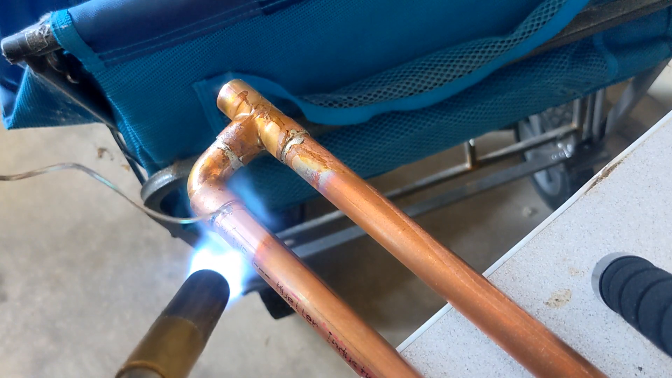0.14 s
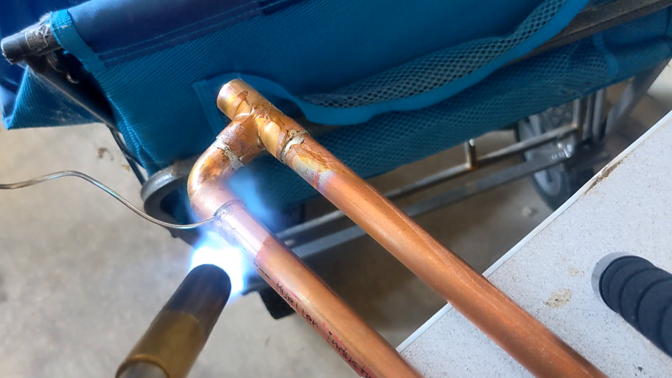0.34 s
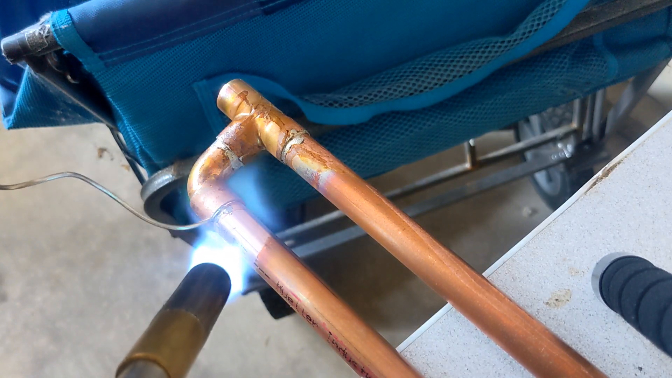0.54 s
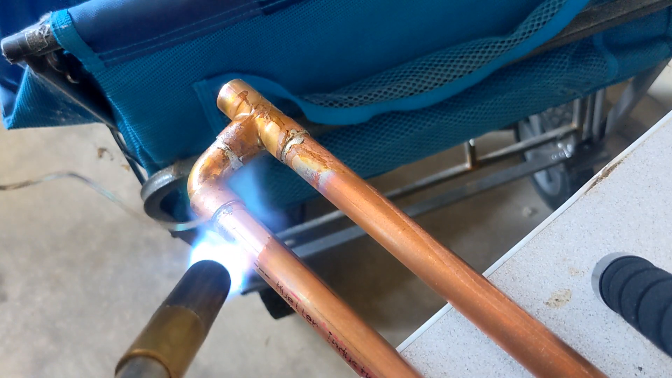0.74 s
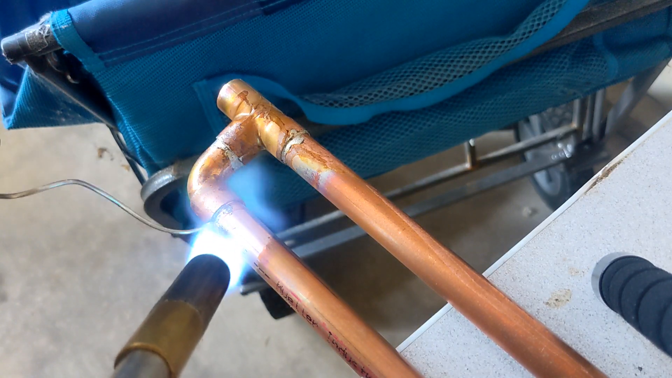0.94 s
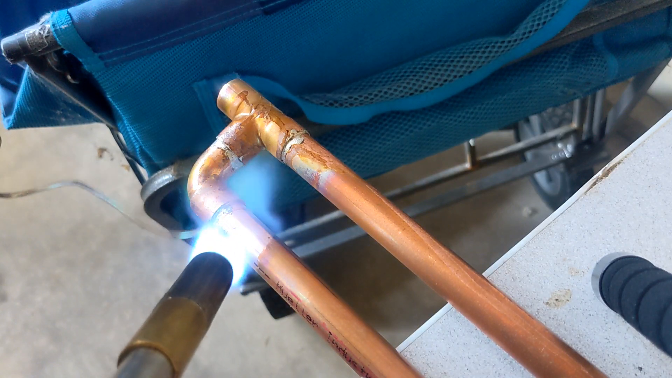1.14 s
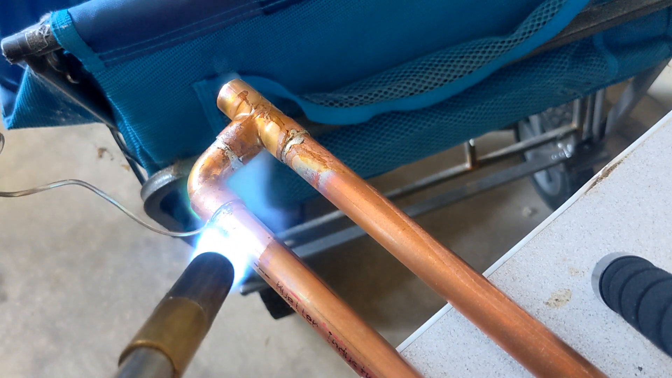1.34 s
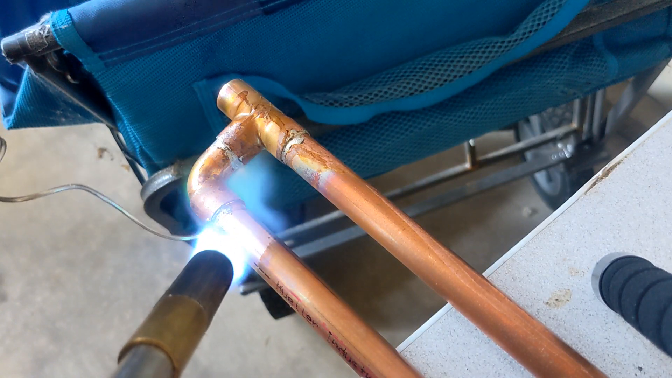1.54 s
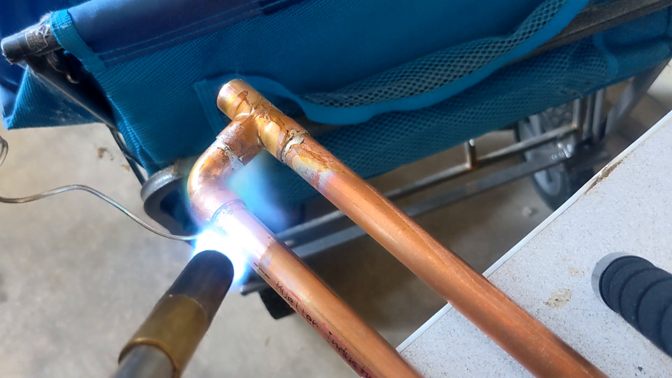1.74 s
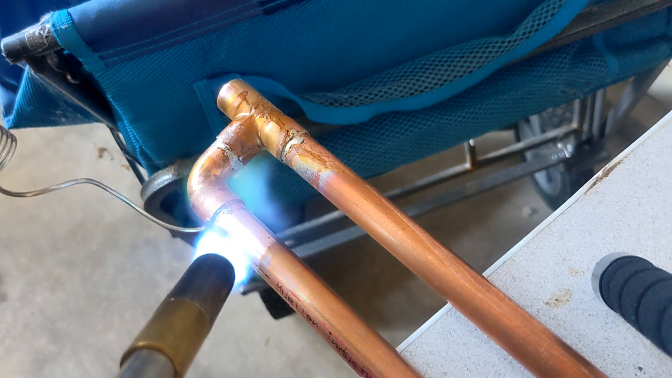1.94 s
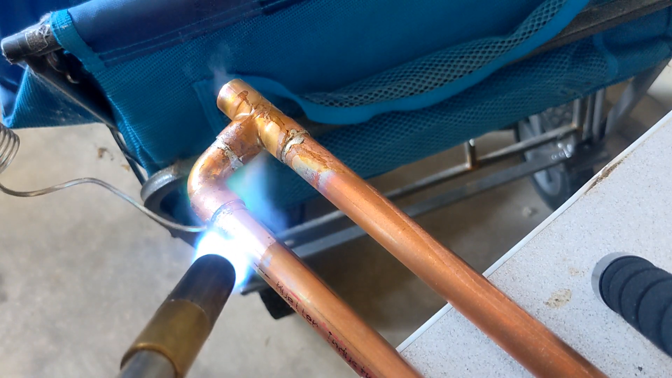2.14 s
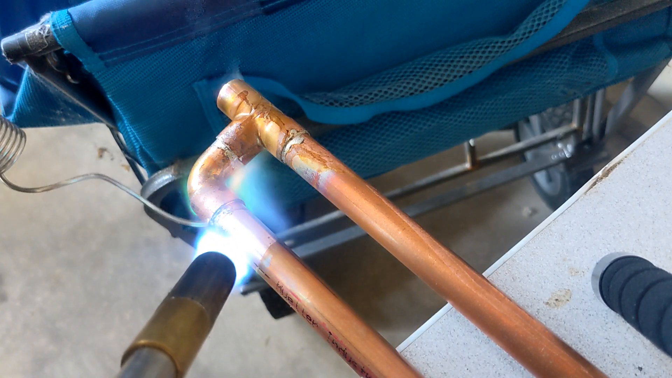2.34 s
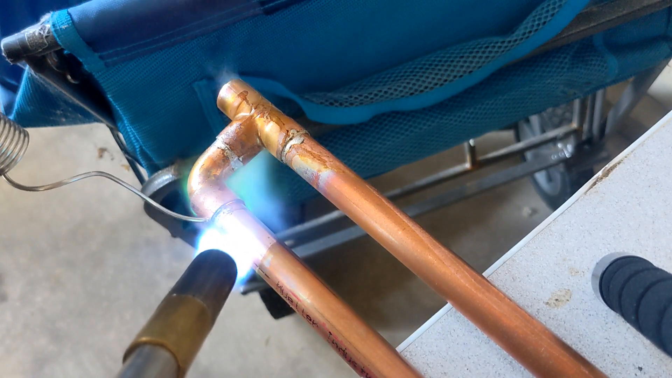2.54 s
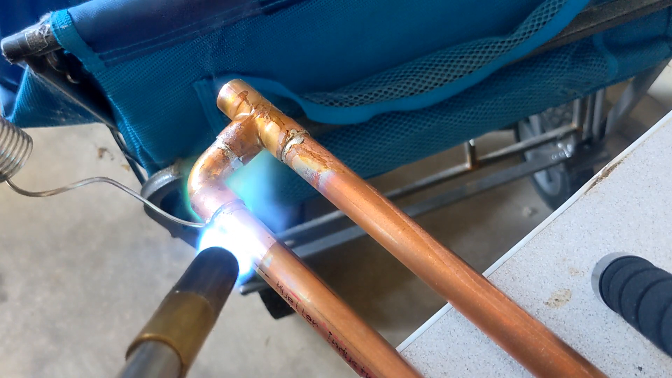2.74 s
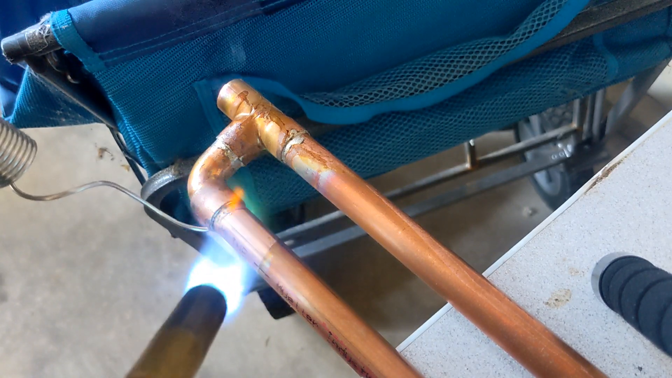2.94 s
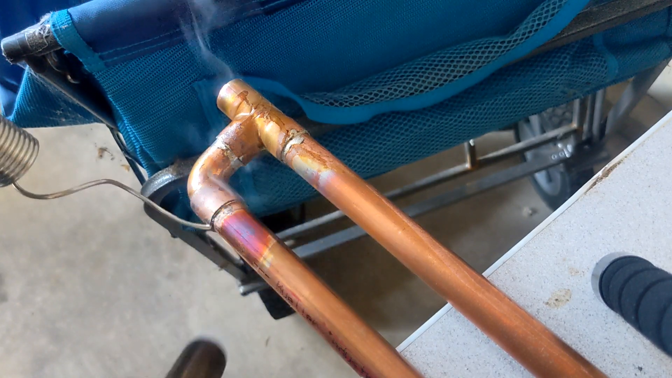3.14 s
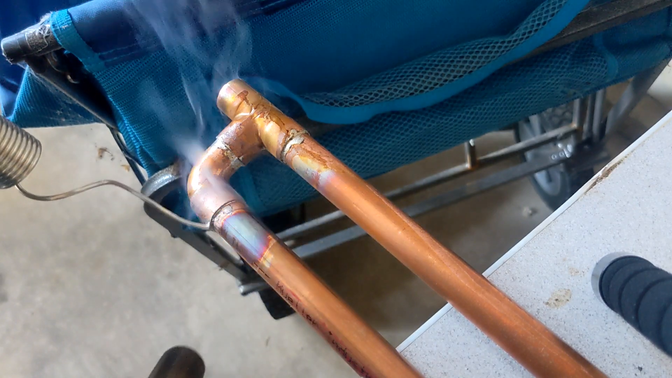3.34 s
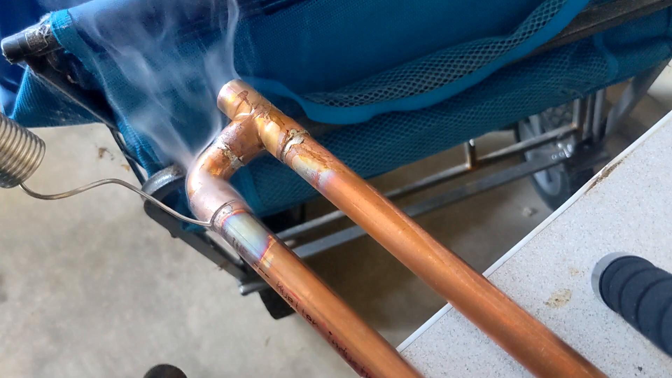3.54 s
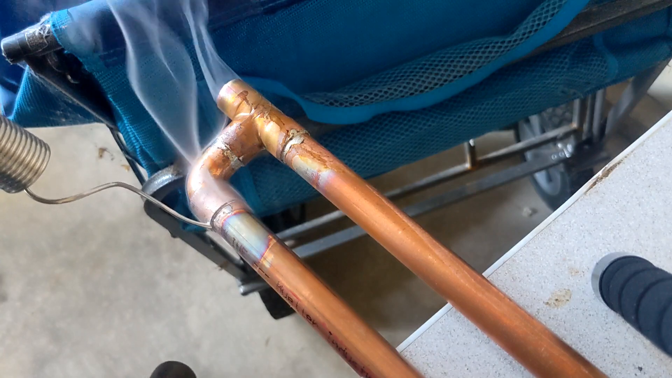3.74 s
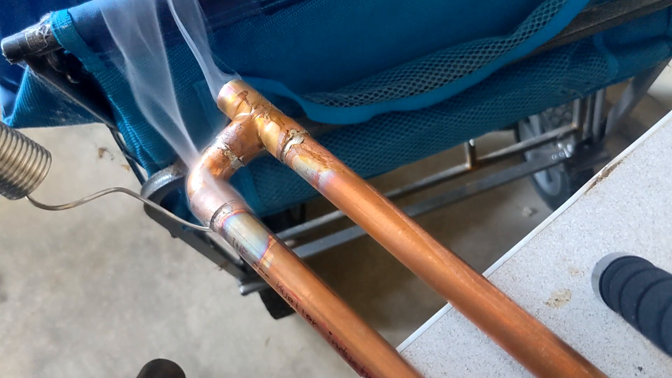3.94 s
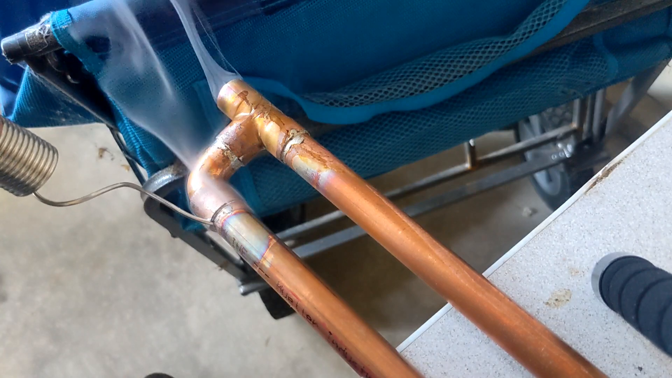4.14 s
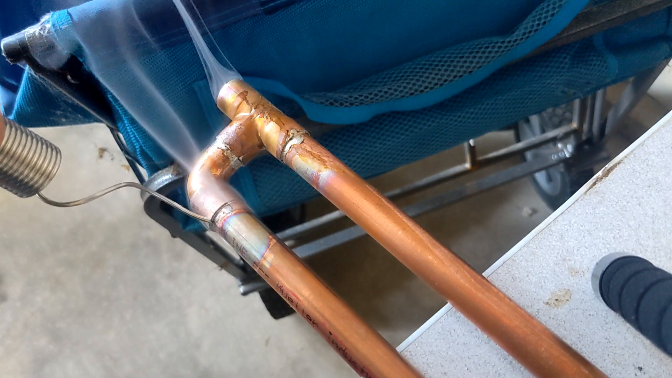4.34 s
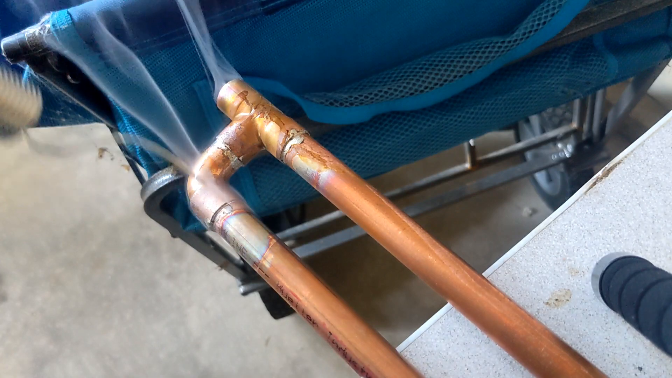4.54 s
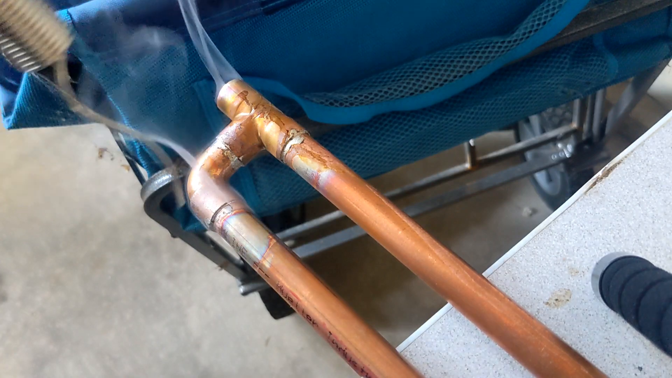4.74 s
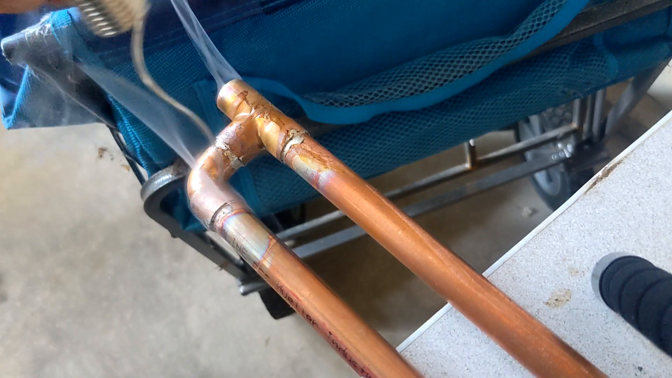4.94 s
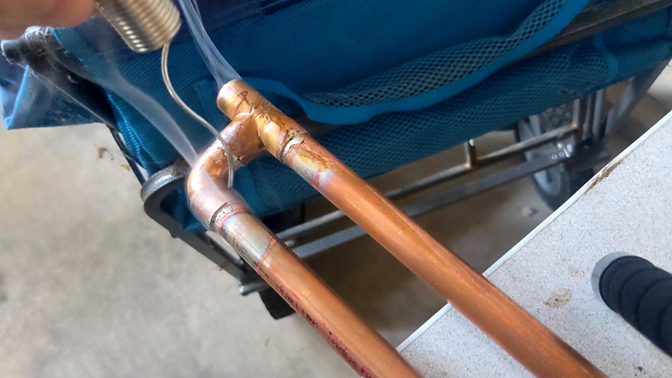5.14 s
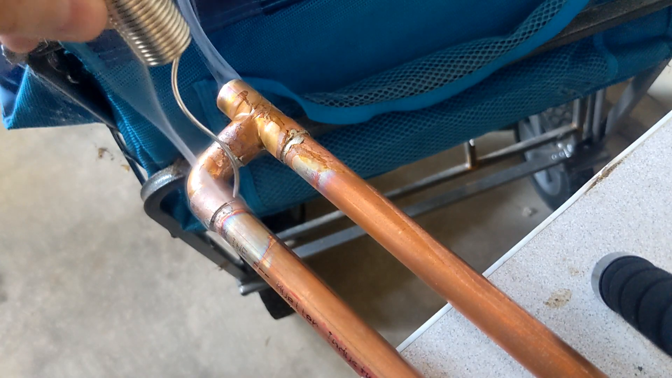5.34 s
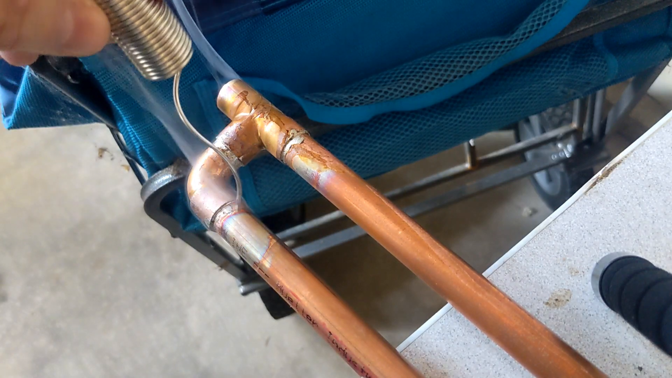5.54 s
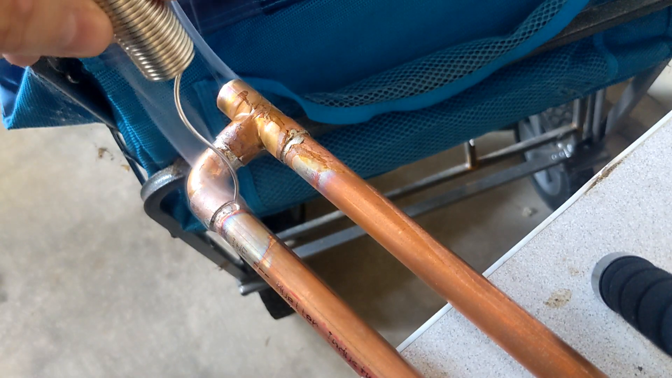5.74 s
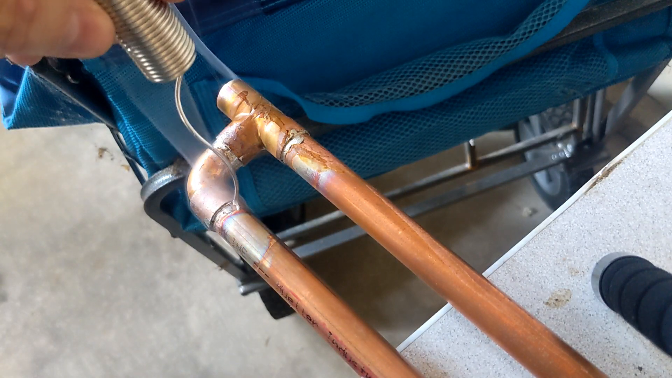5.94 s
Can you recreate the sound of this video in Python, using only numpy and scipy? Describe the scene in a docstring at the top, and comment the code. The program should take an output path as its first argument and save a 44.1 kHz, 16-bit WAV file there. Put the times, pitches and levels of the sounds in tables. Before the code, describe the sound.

A gas torch roars and hisses steadily against copper pipe, shuts off abruptly, then is set down with a quick double knock, leaving appliance hum.

```python
"""A gas torch roars and hisses against a copper pipe in a garage. Its gas is shut off, then it is set
down with two knocks, a spring singing between them; an appliance's hum and a faint later tick are left.
Flame and air are coloured noise, partly alike at the two ports of a close microphone. Hum is steady
sines; knocks are noise cracks, ringing body tones and falling thuds. Echoes and a tail add the room."""
import sys
import numpy as np
from scipy import signal
from scipy.io import wavfile
from scipy.ndimage import uniform_filter1d

SR = 44100
rng = np.random.default_rng(int(sys.argv[2]) if len(sys.argv) > 2 else 0)


def convert_level_to_amplitude(level_db):
    """Map a level in decibels to its linear amplitude factor."""
    exponent = np.asarray(level_db, float) / 20
    return 10 ** exponent


def waveform_to_disk(signal):
    """Save audio, clipped to [-1, 1], as 16-bit WAV at the path in sys.argv[1]."""
    frames = np.transpose(np.atleast_2d(signal))
    scaled = np.clip(frames, -1, 1) * 32767
    samples = np.round(scaled).astype(np.int16)
    wavfile.write(sys.argv[1], SR, samples)


N = 267907  # length in samples

# blows of the torch as it is set down: t/s, blow level/dB, place on the torch (0 base - 1 neck),
# crack level before its filter/dB, first pitch of the thud f/Hz
KNOCKS = [(3.2755, -25, 0, -53, 380), (3.3248, -24, 1, -39, 800), (3.3288, -36, 1, -45, 400)]
LEFT_LATE_S = 0.00023  # the torch reaches the left port later


def read(points, hz):
    """Straight lines between points on a log-frequency axis."""
    f, value = np.transpose(points)
    return np.interp(np.log(hz + 1), np.log(f + 1), value)


def bumps(modes, hz):
    """The dB that resonances and dips add, each strongest at its own frequency."""
    return sum(db / (1 + (2 * (hz - f) / width) ** 2) for f, width, db in modes)


def add(mix, s, sound):
    """Mixes a sound in from time s."""
    part = mix[:, round(s * SR):][:, :sound.shape[1]]
    part += sound[:, :part.shape[1]]


def noise_pair(db, same, lead, patchy_db):
    """Two partly alike noises: level db(hz), likeness same(hz), left phase lead(hz), drifting patches."""
    hz = np.fft.rfftfreq(2048, 1 / SR)
    a, b, c, d, patches = rng.standard_normal((N // 512 + 5, 1025, 5)).T
    patches = uniform_filter1d(patches, size=20, axis=0)  # smooth over frequency
    patches = uniform_filter1d(patches, size=6, axis=1)  # smooth over time
    alike = np.clip(same(hz), 0, 1)[:, None]
    right = a + 1j * b
    left = alike * right + np.sqrt(1 - alike ** 2) * (c + 1j * d)
    left = left * np.exp(1j * lead(hz))[:, None]
    level_db = db(hz)[:, :, None] + patchy_db * patches / patches.std()
    spectrum = np.array([left, right]) * convert_level_to_amplitude(level_db)
    return signal.istft(spectrum * np.sqrt(SR / 2048), nperseg=2048, noverlap=1536)[1][:, :N]


def air():
    """Rumble and fan noise of the garage: long waves make the bass alike at both ports."""
    # colour of the background before it is set to its overall level: f/Hz, relative level/dB
    colour = [(45, -2), (130, -2.5), (200, -4), (320, -16.5), (390, -12), (560, -19), (1000, -23.5),
              (1600, -31.5), (4000, -42.5), (6000, -48), (7200, -46.5), (9300, -52), (10700, -56.5),
              (15000, -51.5)]
    # standing waves and resonances: f/Hz, width/Hz, change/dB
    modes = [(59, 10, 3), (77.2, 12, 4.5), (104.8, 17, -10.5), (204.6, 30, -3.5), (256, 14, 4.5),
             (320, 30, -3.5), (420, 29.8, -4), (701, 53.6, -3), (1320, 280, 3), (2265, 250, 6),
             (3170, 400, 3.5)]
    # how much louder left is than right: f/Hz, difference/dB
    balance = [(60, -0.5), (180, -1), (550, -2), (1650, -2), (4970, -3.5), (15000, 1.5)]
    # likeness of left and right: f/Hz, likeness (0-1)
    likeness = [(60, 1), (250, 0.97), (500, 0.66), (800, 0.4), (1500, 0.19), (8000, .05)]
    level_db, left_lead_s = -42.5, 0.00018  # the background reaches the left port first

    def db(hz):
        return read(colour, hz) + bumps(modes, hz) + np.array([[.5], [-.5]]) * read(balance, hz)

    noise = noise_pair(db, lambda hz: read(likeness, hz),
                       lambda hz: 2 * np.pi * hz * left_lead_s, patchy_db=.5)
    return convert_level_to_amplitude(level_db) * noise / noise.std()


def hum():
    """Sines at multiples of twice the mains frequency and motor tones, steady but for one that throbs."""
    # hum: multiple of twice the mains frequency, left level/dB, right level/dB, left phase lead/rad
    multiples = [(1, -49.6, -51.1, 0), (2, -49.5, -45.7, .08), (3, -69, -67, -.4), (4, -74, -59, -1),
                 (5, -50.9, -46.6, -.6), (6, -51.9, -53.7, .87), (7, -69, -82, -1.5)]
    # motor: f/Hz, left level/dB, right level/dB, left phase lead/rad, depth of throb (0-1)
    motor = [(276.19, -58.5, -61.5, -.15, 0), (617.82, -67, -56.4, -.16, 0), (632.75, -48, -48.2, 1.15, .3),
             (650.96, -68, -70, .84, 0), (784.95, -73, -81, -.46, 0), (992.55, -71, -68.4, 2.13, 0),
             (1232.4, -67.5, -86, .7, 0)]
    twice_mains_hz, throb_per_s = 119.93, 3.3
    t = np.arange(N) / SR
    out = np.zeros((2, N))
    tones = [(k * twice_mains_hz, *rest, 0) for k, *rest in multiples] + motor
    for hz, left_db, right_db, lead, depth in tones:
        turn = 2 * np.pi * (hz * t + rng.random())
        throb = 1 + depth * np.cos(2 * np.pi * throb_per_s * (t - 3.78))
        left = convert_level_to_amplitude(left_db) * np.sin(turn + lead)
        right = convert_level_to_amplitude(right_db) * np.sin(turn)
        out += np.sqrt(2) * throb * np.array([left, right])  # levels are rms
    return out


def tick():
    """A faint dry tick of the wire: a fast-dying band of noise, the same at both ports."""
    # one row: level before the band filter/dB, middle f/Hz, width/Hz
    shape = (-48, 5900, 3600)
    db, hz, width = shape
    start_s, t60_s = 5.6135, 0.019
    out = np.zeros((2, N))
    t = np.arange(600) / SR
    band = signal.butter(3, [hz - width / 2, hz + width / 2], "bandpass", fs=SR, output="sos")
    noise = signal.sosfilt(band, rng.standard_normal((1, len(t))))
    add(out, start_s, convert_level_to_amplitude(db - 60 * t / t60_s) * noise)
    return out


def garage(x):
    """Room tail: sparse taps of random sign, each band dying at its own speed."""
    # time to die by 60 dB: f/Hz, t60/s
    decay = [(150, 0.59), (600, 0.34), (2500, 0.49), (8000, 0.31), (15000, .25)]
    taps = np.zeros((2, SR))
    at = np.arange(300, SR - 20, 20) + rng.integers(0, 20, (2, (SR - 301) // 20))
    np.put_along_axis(taps, at, rng.choice([-1., 1.], at.shape), 1)
    hz, t, z = signal.stft(taps, SR, nperseg=256)
    alike = np.exp(-(hz[:, None] / 1500) ** 2)  # long waves reach both ports alike
    z = np.array([alike * z[1] + np.sqrt(1 - alike ** 2) * z[0], z[1]])
    dying = convert_level_to_amplitude(-60 * t / read(decay, hz)[:, None])
    tail = signal.istft(z * dying, SR, nperseg=256)[1]
    return signal.fftconvolve(x, tail / np.linalg.norm(tail[0]), axes=1)[:, :N]


def echoed(x):
    """The direct sound and its first few delayed copies."""
    # echoes off pipe, bench and floor: delay t/s, left gain, right gain
    echoes = [(.0030, 0.067, 0.12), (.0042, 0.083, 0.17), (.00535, 0.0061, -0.036), (.0076, -0.037, 0.032),
              (.011, -.08, 0.051), (.016, 0.039, -0.083)]
    out = x.copy()
    for s, left, right in echoes:
        add(out, s, x * np.array([[left], [right]]))
    return out


def spring():
    """A wavering tone whose pitch arches as it swells, until the second knock damps it."""
    start_db, swell_db, damped_t60_s = -45, 3.5, .04
    base_hz, arch_hz = 1210, 100
    length = KNOCKS[1][0] - KNOCKS[0][0]
    t = np.arange(SR // 5) / SR
    u = np.minimum(t / length, 1)  # 0 at the first knock, 1 from the second on
    waver = uniform_filter1d(rng.standard_normal(len(t)), size=150)
    hz = (base_hz + arch_hz * np.sin(np.pi * u ** .7)) * (1 + .3 * waver)
    db = start_db + swell_db * u - 60 * np.maximum(t - length, 0) / damped_t60_s
    return np.sqrt(2) * convert_level_to_amplitude(db) * np.sin(2 * np.pi * np.cumsum(hz) / SR)


def thud(t, top_hz):
    """A dying low tone: its pitch drops fast as the contact spreads, then sags slowly."""
    level_db, t60_s = 2, .15  # level is against the blow
    low_hz, drop_s, sag_s = 245, .003, .05
    hz = low_hz * np.exp(-t / sag_s) + (top_hz - low_hz) * np.exp(-t / drop_s)
    swell = np.minimum(t / .003, 1)
    return convert_level_to_amplitude(level_db - 60 * t / t60_s) * swell * np.sin(2 * np.pi * np.cumsum(hz) / SR)


def knocks():
    """Setting down: each blow is a crack, a body ring and a falling thud; the first starts the spring."""
    # what torch and bench ring with, against the blow:
    # f/Hz, level struck at the base/dB, level struck at the neck/dB, t60/s
    body_modes = [(95, -4, -12, .2), (140, -8, -10, .12), (218, -12, -6, .12), (390, -12, -9, .05),
                  (620, -3, -1, .03), (850, -10, -4, .022), (1350, -10, -9, .018), (2250, -6, -24, .02),
                  (2620, -11, -24, .045), (3200, -24, -10, .024), (3620, -4, -15, .018),
                  (3850, -6, -14, .018), (4400, -30, -12, .014), (5000, -28, -14, .011),
                  (6900, -24, -20, .02), (8100, -26, -19, .018)]
    crack_band_hz, crack_t60_s = [500, 12000], .016
    pan_db = -3.5  # left against right
    pan = convert_level_to_amplitude([[pan_db / 2], [-pan_db / 2]])
    out = np.zeros((2, N))
    t = np.arange(SR // 3) / SR
    chance = rng.standard_normal((len(KNOCKS), 2, len(t)))
    dull = signal.butter(2, crack_band_hz, "bandpass", fs=SR, output="sos")
    for (s, blow_db, place, crack_db, top_hz), grit in zip(KNOCKS, chance):
        body = np.zeros(len(t))
        for hz, base_db, neck_db, t60 in body_modes:
            ring = convert_level_to_amplitude((1 - place) * base_db + place * neck_db - 60 * t / t60)
            build_up = np.minimum(t / (.0008 + .8 / hz), 1)  # low modes take longer
            body += ring * build_up * np.sin(2 * np.pi * hz * t)
        noise = signal.sosfilt(dull, grit[0] + .5 * grit)  # partly alike at the ports
        crack = convert_level_to_amplitude(crack_db - 60 * t / crack_t60_s) * noise
        add(out, s, pan * (convert_level_to_amplitude(blow_db) * (body + thud(t, top_hz)) + crack))
    add(out, KNOCKS[0][0], pan * spring())
    return np.array([np.roll(out[0], round(LEFT_LATE_S * SR)), out[1]])


def gas_flow():
    """Steady, then the valve closes ever faster and the gas left in the tube drains out."""
    flow_db, shut_s = 0.82, 3.0864  # steady until the valve starts to close
    close_db, close_s, close_bend = -25.5, 0.086, 1.5  # close_db down after close_s
    bleed_db, bleed_t60_s = -29, 0.53  # against the steady flow
    after = np.maximum(np.arange(N) / SR - shut_s, 0)
    closing = convert_level_to_amplitude(np.maximum(close_db * (after / close_s) ** close_bend, -200))
    draining = convert_level_to_amplitude(bleed_db - 60 * after / bleed_t60_s)
    return convert_level_to_amplitude(flow_db) * np.maximum(closing, draining)


def flame():
    """Turbulent burning and jet noise, coloured by the path to each port, following the gas flow."""
    # broad colour of roar and hiss at each port, before the gas flow: f/Hz, level per Hz/dB
    tilt_left = [(40, -99.5), (70, -63.5), (120, -61.5), (220, -51.5), (450, -59.5), (900, -45.5),
                 (1800, -47), (3500, -53.5), (7000, -79.5), (15600, -73)]
    tilt_right = [(40, -81), (70, -61), (120, -61.5), (220, -46.5), (450, -54.5), (900, -44), (1800, -48.5),
                  (3500, -45.5), (7000, -67.5), (15600, -70)]
    # resonances and dips of burner tube, pipe, bench and microphone body: f/Hz, width/Hz, change/dB
    path_left = [(215, 67, 1), (322, 16, 5.5), (800, 39, -1.5), (2168, 36, 9.5), (556, 20, -3),
                 (742, 47, 6), (861.4, 35.7, 7.5), (949, 74, -9.0), (1010, 64, -13.5), (1289, 46, -4),
                 (1780, 484, -15.5), (2094, 64, -2.0), (2247, 19, -4.5), (2580, 340, -9.5),
                 (3130, 840, -11.0), (3180, 82, 0.5), (4060, 820, -9.5), (4170, 36, -10), (4800, 30, -7),
                 (5430, 580, -7), (6500, 478, 8), (7452, 1349, 11.5), (8523, 420, 5), (9222, 470, -7.5),
                 (9469, 150, 3.5), (10030, 204, -13), (10600, 356, 11.5), (10724, 1143, -17),
                 (11128, 100, -9.5)]
    path_right = [(295, 39.7, -6.5), (318, 22, 3), (553, 18, -8), (817, 77, 2), (1850, 80, 4),
                  (494, 109, 7), (954, 115, -11), (1314, 315, 4.0), (1408, 31, 3), (1532, 152, -11.5),
                  (2070, 89, -3), (2510, 58, -10), (2670, 43.6, -4), (2710, 740, -11.5), (2997, 81, -1),
                  (3290, 32, 7), (3325, 60, -10.5), (3845, 1296, -14.0), (5300, 38, 2.5), (5590, 310, -11),
                  (6020, 84, -14), (6140, 170, 5), (6570, 216, -2.5), (7210, 690, 11.5), (8330, 1420, 7),
                  (9090, 220, 7), (10204, 186, 2), (12850, 220, 6.5), (13518, 430, 0.5)]
    # likeness of left and right: f/Hz, likeness (0-1)
    likeness = [(60, 0.89), (1400, 1), (2000, 1), (2800, 0.47), (3400, 0.6), (4000, 0.6), (4800, 0.92),
                (5800, 0.49), (6700, 0), (7500, .85), (8400, .65), (9000, .3), (12000, .2), (13500, .45)]
    # phase turned by the two paths besides the left port's delay: f/Hz, left phase lead/rad
    path_turn = [(600, 0.44), (1460, -.5), (1810, 1), (2410, 0.28), (3270, 1), (4480, 0.77), (6370, 2),
                 (7320, 0.5), (8900, -1.2), (9400, -2.5), (13400, -.2), (13600, 1), (14100, 0.2)]

    def db(hz):
        left = read(tilt_left, hz) + bumps(path_left, hz)
        right = read(tilt_right, hz) + bumps(path_right, hz)
        return np.array([left, right])

    def lead(hz):
        return read(path_turn, hz) - 2 * np.pi * hz * LEFT_LATE_S

    roar = noise_pair(db, lambda hz: read(likeness, hz), lead, patchy_db=0.7)
    flutter = uniform_filter1d(rng.standard_normal(N), size=300)  # the flame front flaps
    return roar * gas_flow() * convert_level_to_amplitude(0.28 * flutter / flutter.std())


def scene():
    """Torch with its room, over the steady background and the tick."""
    torch = flame() + knocks()
    return echoed(torch) + convert_level_to_amplitude(-16.0) * garage(torch) + tick() + hum() + air()


def roll_off(x):
    """The treble ends steeply here."""
    return signal.sosfilt(signal.butter(12, 16650, fs=SR, output="sos"), x)


def record(dry):
    """Bass cut of the microphone, then a steep limit to the treble."""
    low_hz, edge_hz = 48, 15760
    bass_cut = signal.butter(6, low_hz, "highpass", fs=SR, output="sos")
    cut = signal.sosfilt(bass_cut, dry)
    edge = signal.firwin(1023, edge_hz, window=("kaiser", 9), fs=SR)
    mix = signal.oaconvolve(cut, edge[None], "same")
    return roll_off(mix)


dry = scene()
out = record(dry)
waveform_to_disk(out)
```